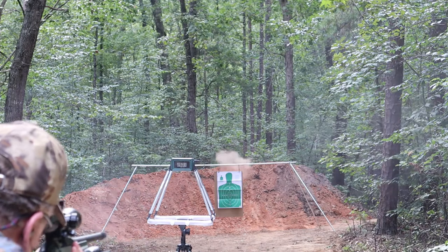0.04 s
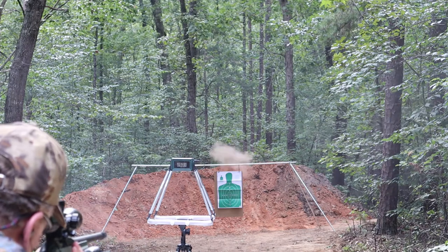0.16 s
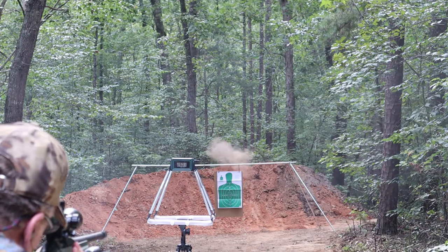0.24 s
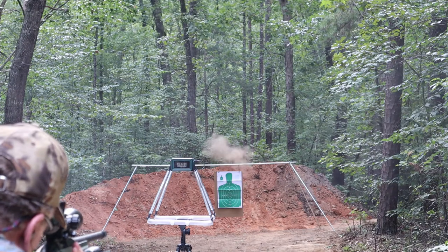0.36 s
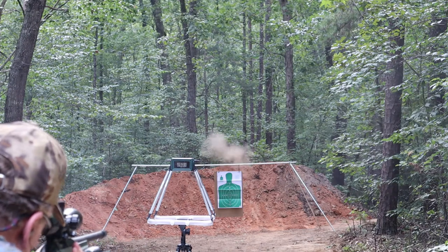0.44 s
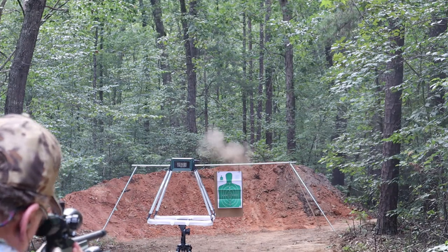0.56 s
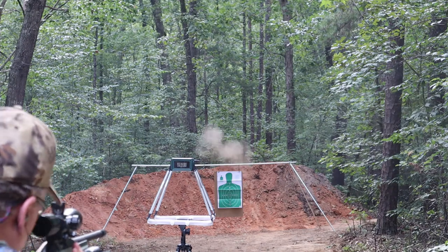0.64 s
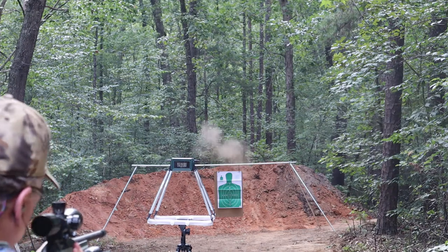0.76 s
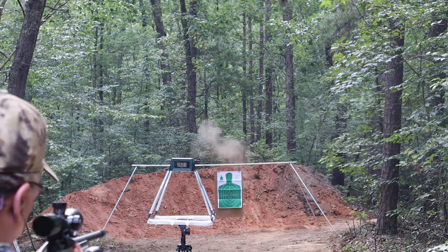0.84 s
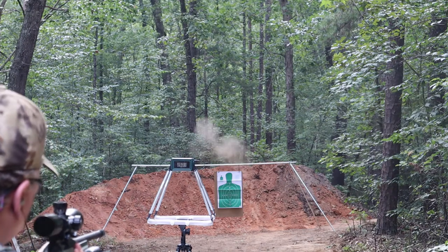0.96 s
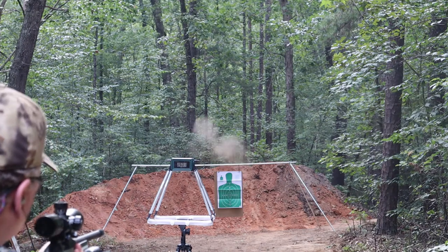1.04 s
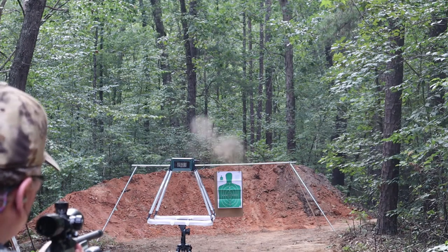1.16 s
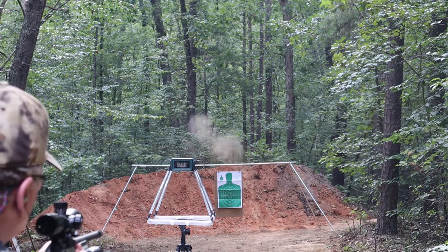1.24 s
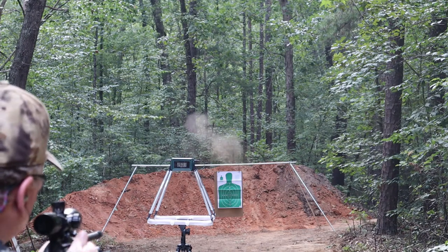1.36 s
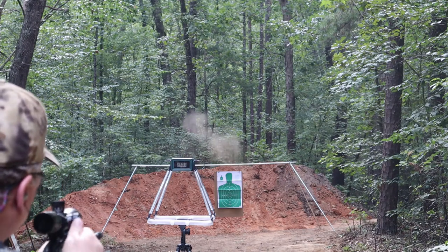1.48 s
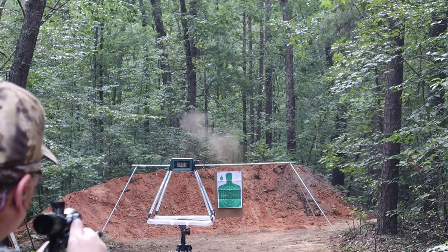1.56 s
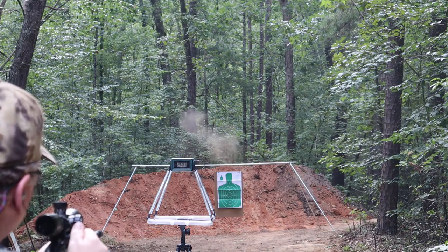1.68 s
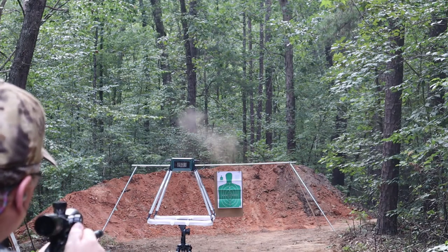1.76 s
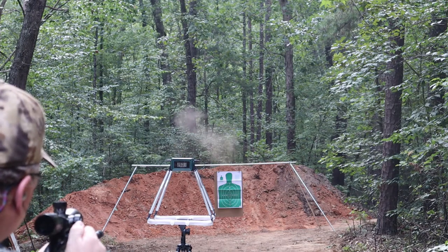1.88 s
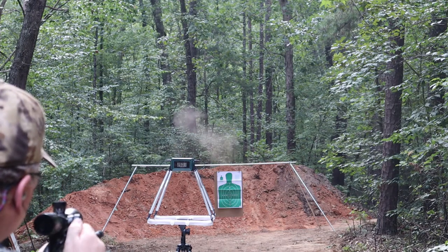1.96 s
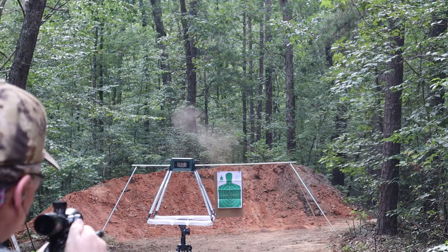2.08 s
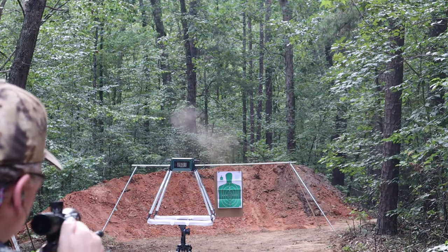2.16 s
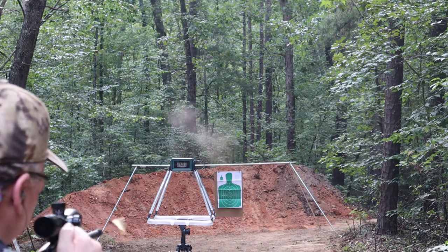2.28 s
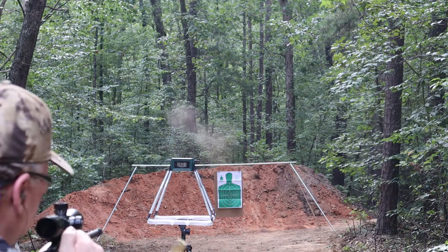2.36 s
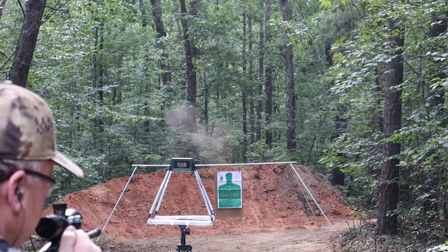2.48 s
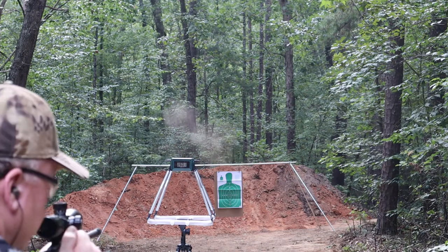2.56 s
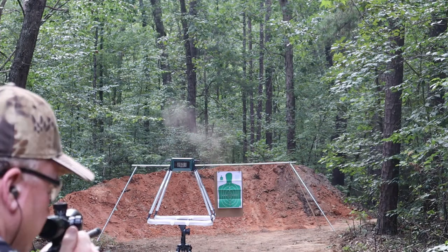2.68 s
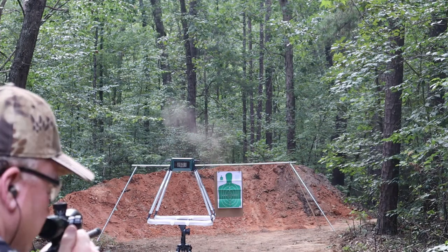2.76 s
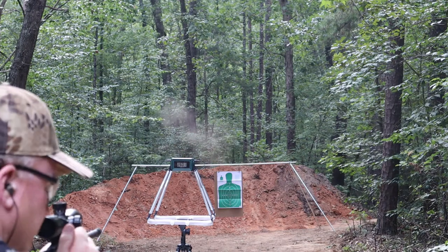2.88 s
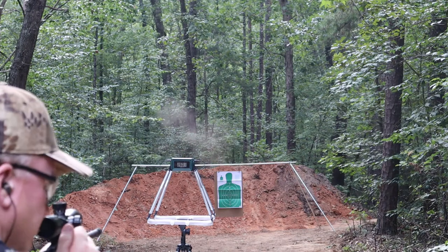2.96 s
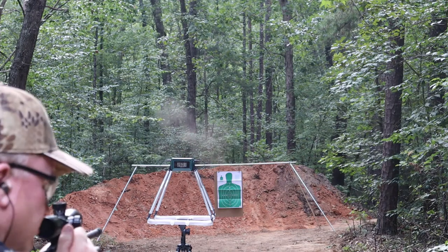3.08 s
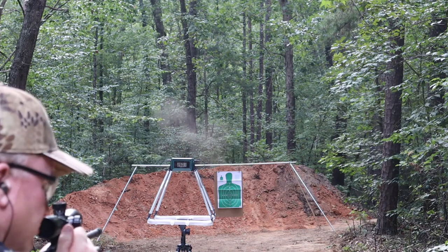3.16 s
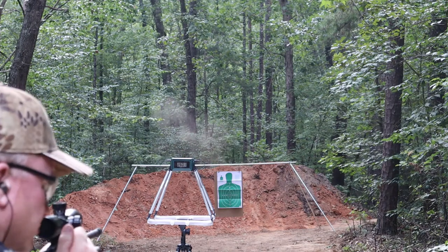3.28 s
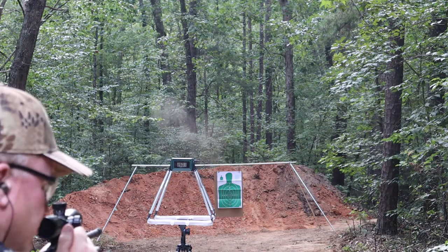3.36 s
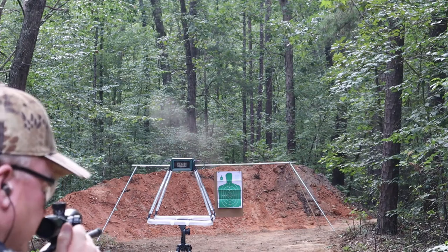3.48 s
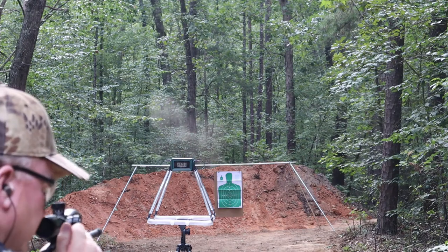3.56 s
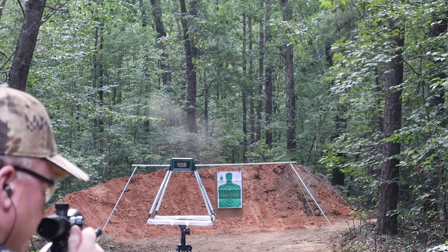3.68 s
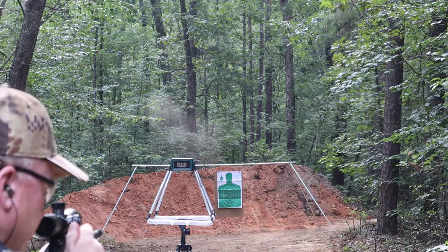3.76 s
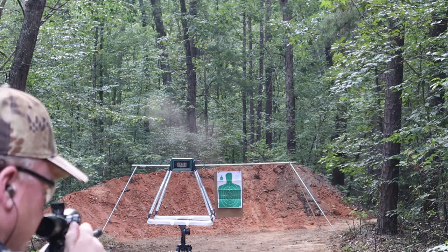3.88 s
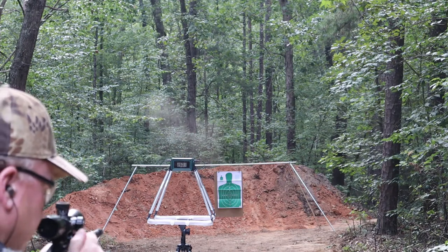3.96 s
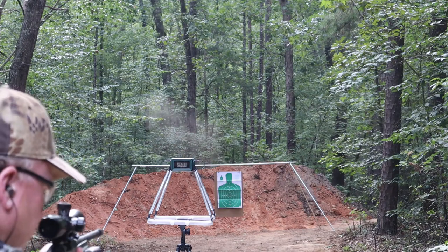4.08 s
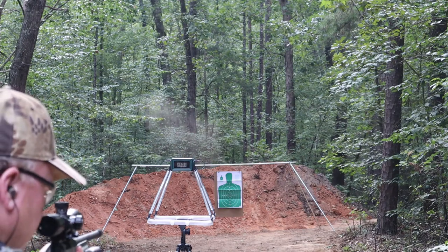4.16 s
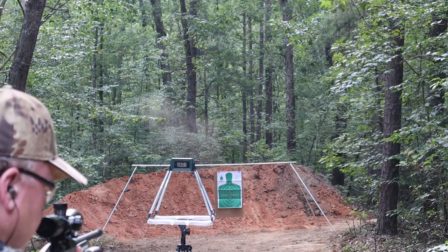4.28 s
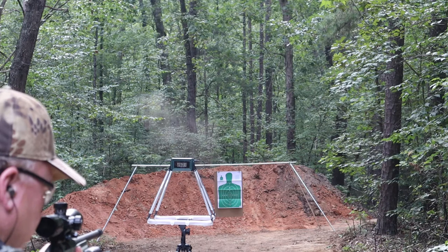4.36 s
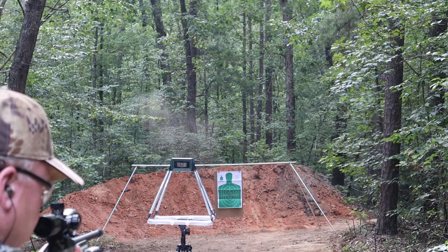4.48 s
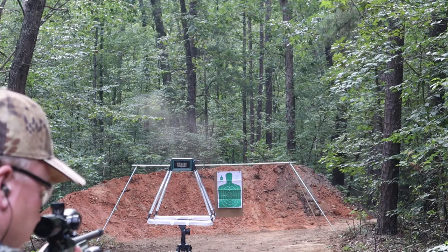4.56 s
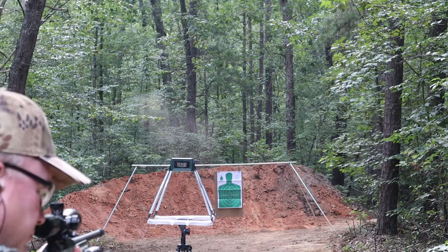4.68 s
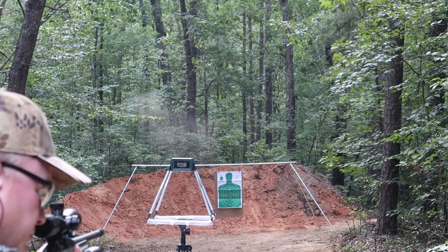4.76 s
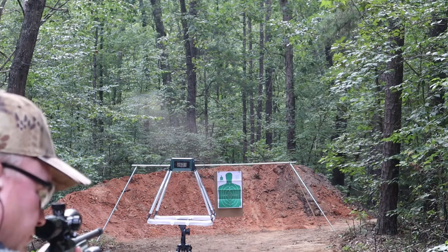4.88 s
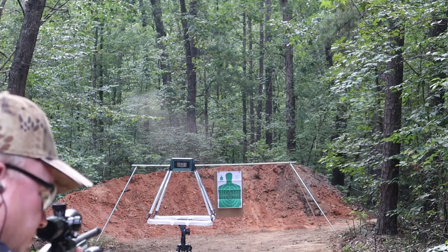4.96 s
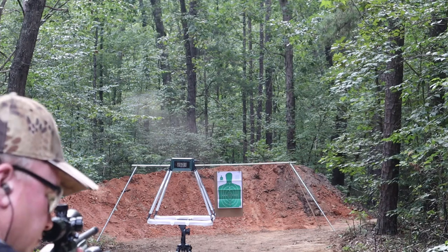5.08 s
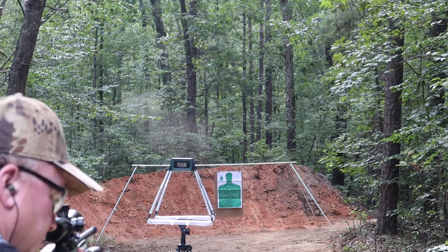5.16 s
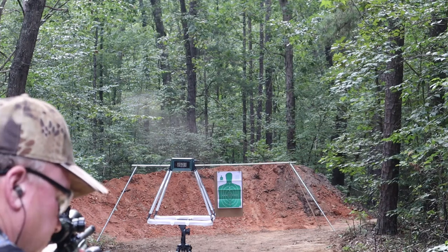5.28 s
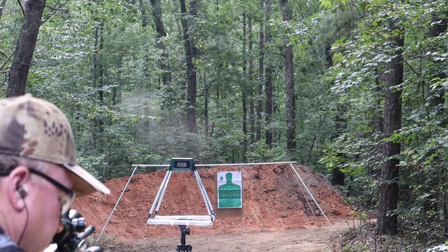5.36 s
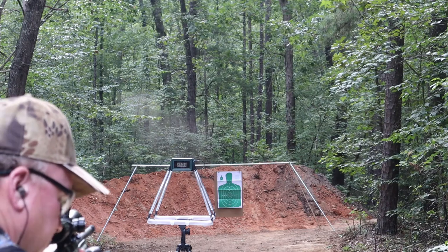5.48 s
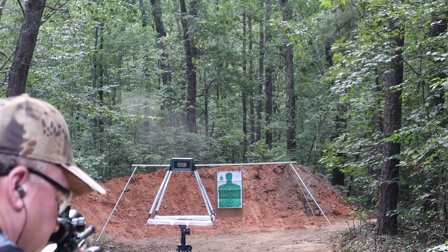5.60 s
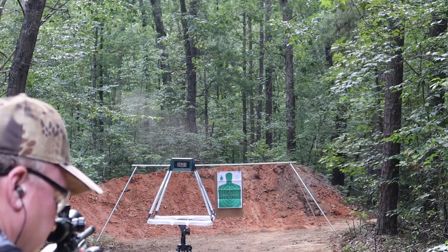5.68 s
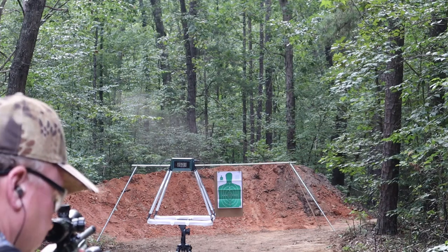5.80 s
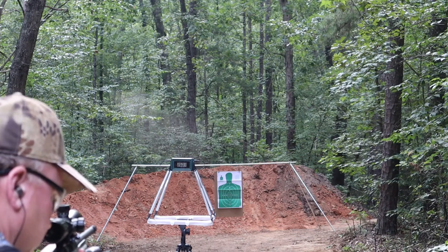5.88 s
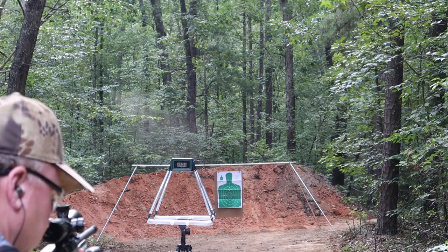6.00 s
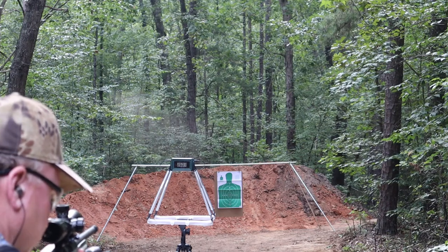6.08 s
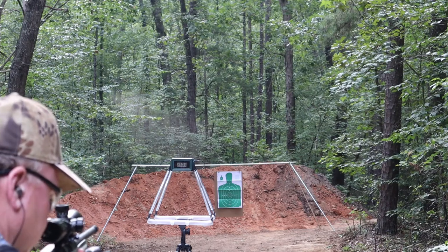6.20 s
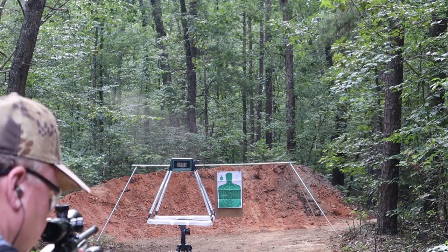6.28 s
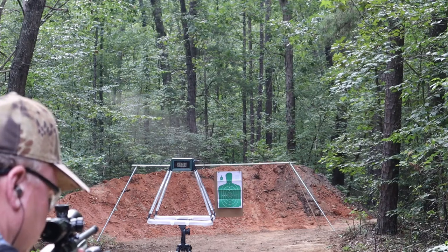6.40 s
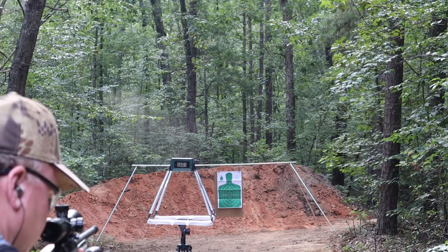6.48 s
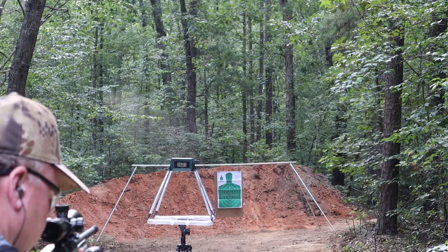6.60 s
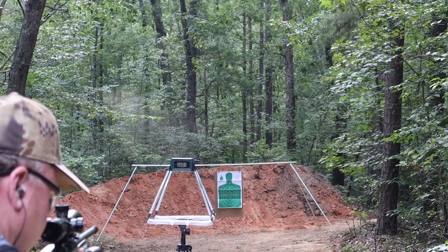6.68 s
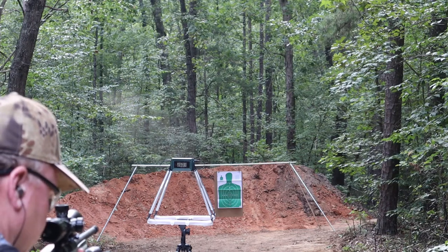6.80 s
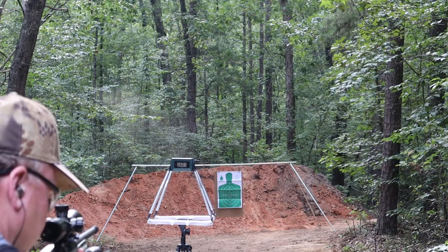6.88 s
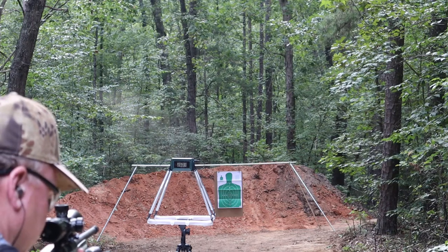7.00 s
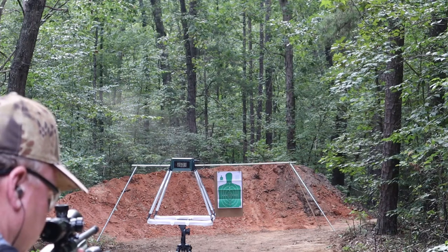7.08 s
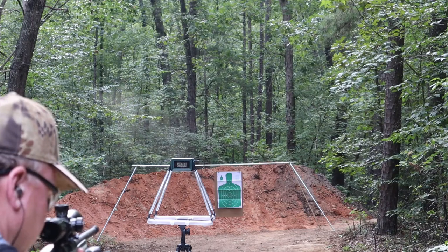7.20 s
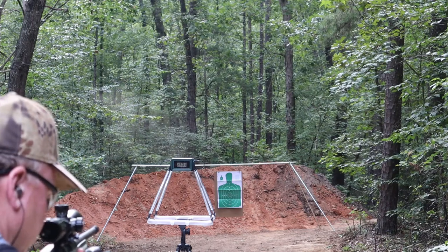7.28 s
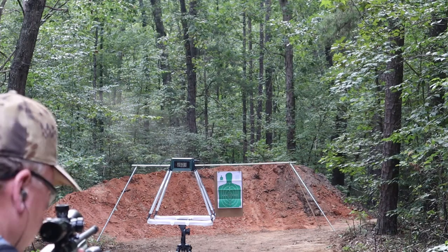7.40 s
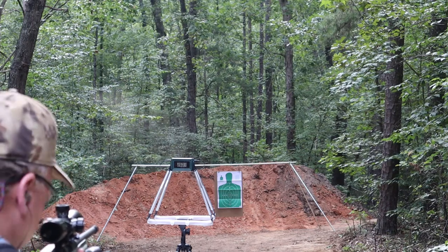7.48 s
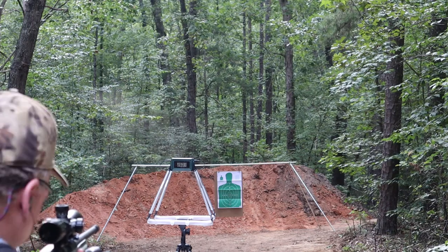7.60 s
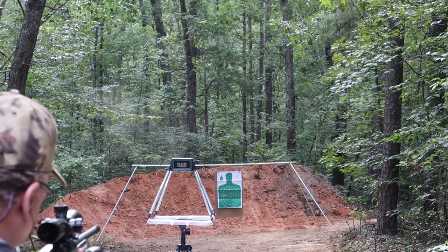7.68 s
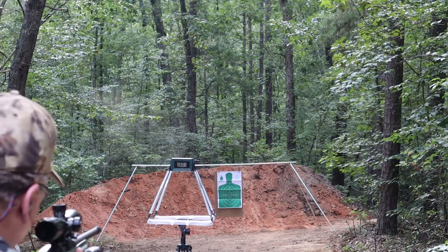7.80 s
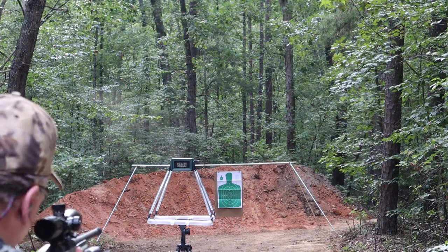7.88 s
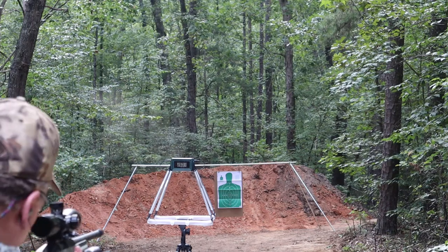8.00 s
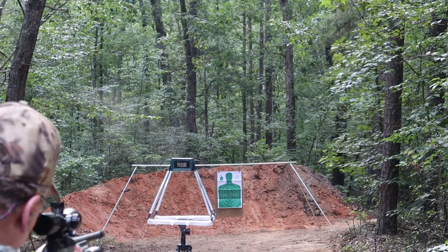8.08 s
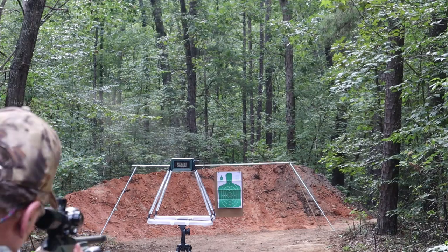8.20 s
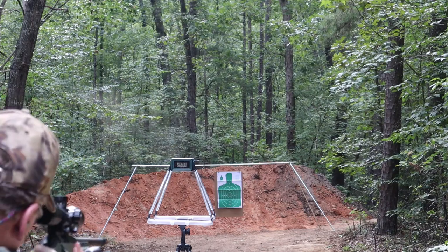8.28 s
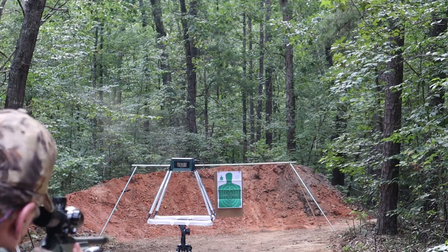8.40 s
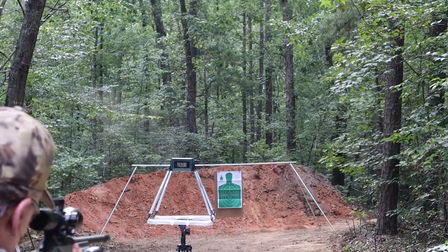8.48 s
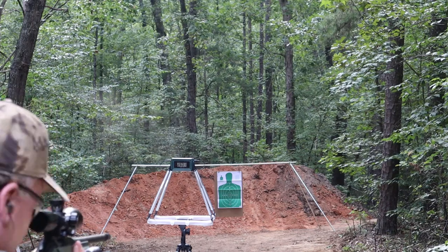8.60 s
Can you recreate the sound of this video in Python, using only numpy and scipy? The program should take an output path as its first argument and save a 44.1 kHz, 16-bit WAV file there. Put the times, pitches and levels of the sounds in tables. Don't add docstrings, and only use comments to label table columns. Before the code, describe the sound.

Gunshot echo fades among trees, followed by crisp metallic bolt working, a ringing case on a bench, a hard lock-up and faint insects.

```python
import sys
import numpy as np
from scipy import signal
from scipy.fft import rfft, irfft
from scipy.io import wavfile
from scipy.ndimage import uniform_filter1d

SR = 44100
rng = np.random.default_rng(int(sys.argv[2]) if len(sys.argv) > 2 else 0)


def unload_wav(signal):
    wavfile.write(
        sys.argv[1],
        SR,
        np.round(np.clip(np.atleast_2d(signal).T, -1, 1) * 32767).astype(np.int16),
    )


def natural_amplitude(level_db):
    exponent = np.asarray(level_db, float) / 20
    return 10 ** exponent


N = 381134
HZ = np.fft.rfftfreq(512, 1 / SR)
FRAME_S = np.arange(N // 128 + 5) * 128 / SR


def evened(x):
    return x / np.sqrt(np.mean(x ** 2) + 1e-20)


def read(points, hz):
    f, value = np.transpose(points)
    return np.interp(np.log(hz + 1), np.log(f + 1), value)


def band_db(points, lo, hi):
    db = read(points, HZ)
    inside = (HZ >= lo) & (HZ < hi)
    return db - 10 * np.log10(np.sum(natural_amplitude(db[inside]) ** 2) / len(HZ))


def spectrogram(x):
    return signal.stft(x, nperseg=512, noverlap=384)[2]


def resynth(z):
    return signal.istft(z, nperseg=512, noverlap=384)[1][..., :N]


def shaped(x, db):
    z = spectrogram(x)
    return resynth(z * natural_amplitude(db)[..., :z.shape[-1]])


def patches(tall, long):
    field = rng.standard_normal((len(FRAME_S), len(HZ))).T
    field = uniform_filter1d(field, int(tall), 0)
    return evened(uniform_filter1d(field, int(long), 1))


def rough(depth_db, samples):
    wobble = evened(uniform_filter1d(rng.standard_normal(N), samples))
    return evened(natural_amplitude(depth_db * wobble))


def mid_side(db, side, grain=1, lean=0):
    noise = rng.standard_normal((N, 2)).T * grain
    mid, side = shaped(noise, np.array([db, db + read(side, HZ)[:, None]]))
    return np.array([mid, side + lean * mid])


def add(mix, s, sound):
    part = mix[:, round(s * SR):][:, :sound.shape[1]]
    part += sound[:, :part.shape[1]]


def recorder_gain_db():
    duck_db, climb_db_per_s = -17.5, 4.5
    clamp_db, clamp_s = -5.5, 0.87
    climb = np.minimum(duck_db + climb_db_per_s * FRAME_S, 0)
    return climb + clamp_db * np.exp(-(FRAME_S / clamp_s) ** 4)


# t/s, level/dB
GUSTS = [(0, -46), (1.5, -75.5), (2.2, -64.5), (3.9, -63), (4.6, -58), (5.2, -59.5), (6.1, -60.5),
         (7.6, -53.5), (8.64, -58.5)]
# f/Hz, level/dB per Hz
WIND = [(20, -3), (45, -2), (80, 9.5), (140, -27), (250, -18), (500, -73)]


def wind():
    side_db = -12
    level_db = np.interp(FRAME_S, *np.transpose(GUSTS)) + recorder_gain_db()
    db = band_db(WIND, 25, 120)[:, None] + level_db + 1.5 * patches(3, 30)
    return mid_side(db, [(20, side_db), (500, side_db)])


HISS_DB = -82.5
# f/Hz, level/dB per Hz
LEAVES = [(59, -17.5), (100, 1.5), (157, -5), (555, -10), (668, -13), (2080, -23), (2720, -24), (6750, -33),
          (8470, -33), (9390, -38.5), (10800, -38), (12300, -42.5), (14200, -57)]
# f/Hz, side minus mid level/dB
LEAVES_SIDE = [(60, -35.5), (150, -5.5), (360, -2.5), (900, 3), (2210, 4), (5460, 4.5), (13400, 8)]


def leaves():
    level_db = HISS_DB + recorder_gain_db()
    db = band_db(LEAVES, 9140, 14200)[:, None] + level_db + 0.58 * patches(7.1, 22)
    return mid_side(db, LEAVES_SIDE)


# f/Hz, width/Hz, level/dB over the hiss
INSECTS = [(8355, 810, 8.5)]


def insects():
    chorus_db, bolder_db_per_s = -6.5, 0.95
    level_db = HISS_DB + recorder_gain_db() + chorus_db + bolder_db_per_s * FRAME_S
    throb_db = 1.5 * patches(20, 6)
    out = np.zeros((2, N))
    for hz, width, db in INSECTS:
        hump = [(hz - width, -30), (hz - width / 2, -8), (hz, 0), (hz + width / 2, -6), (hz + width, -30)]
        out += mid_side(band_db(hump, 0, SR)[:, None] + level_db + db + throb_db, LEAVES_SIDE)
    return out


# f/Hz, level/dB per Hz
ECHO_FRESH = [(18, -51.5), (30, -14), (144, -20), (344, -9), (434, -5), (493, -7), (654, -3), (1040, -9),
              (3050, -12.5), (12000, -22.5), (14800, -32)]
ECHO_MIDDLE = [(18, -63), (30, -32), (60, -23.5), (181, -21), (381, -1.5), (546, 3.5), (890, -7),
               (2200, -18), (4160, -29), (10500, -53.5), (13900, -74.5)]
ECHO_OLD = [(20, -62), (60, -32), (140, -26), (220, -12.5), (350, -3.5), (520, -3), (800, -10.5),
            (1200, -24), (2000, -36), (3500, -59), (8000, -104)]
# f/Hz, side minus mid level/dB
ECHO_SIDE = [(60, -5.5), (150, -34.5), (360, -13), (900, -2.5), (2210, 3), (5460, 6), (13400, 5.5)]
# t/s, peak level/dB, left minus right level/dB
TRUNKS = [(0.015, -17.5, 29), (0.055, -23, 13.5), (0.097, -13.5, 14), (0.162, -11.5, 5), (0.567, -42, 9),
          (0.738, -24, 4.5)]


def echo():
    swell_s, swell_db = 0.18, -6
    near_db, near_db_per_s, far_db, far_db_per_s = -6.5, 34.5, -19, 15
    late = np.maximum(FRAME_S - swell_s, 0)
    power = natural_amplitude(near_db - near_db_per_s * late) ** 2 + natural_amplitude(far_db - far_db_per_s * late) ** 2
    swell = swell_db * np.maximum(1 - FRAME_S / swell_s, 0) ** 2
    level_db = 10 * np.log10(power) + swell + recorder_gain_db()

    dull = np.clip(2.557 * (1 - np.exp(-FRAME_S / 1.398)), 0, 3)
    fresh, middle, old = (band_db(c, 300, 800)[:, None] for c in (ECHO_FRESH, ECHO_MIDDLE, ECHO_OLD))
    colour = fresh + np.minimum(dull, 1) * (middle - fresh) + np.maximum(dull - 1, 0) * (old - middle)
    db = colour + level_db + 0.8545 * patches(8.2, 12)
    lean = 0.122 * (1 - np.exp(-np.arange(N) / SR / 0.28))
    out = mid_side(db, ECHO_SIDE, rough(0.79, 60), lean)

    trunk_hz, trunk_db = 650, -3
    t = np.arange(-132, 132) / SR
    bump = np.cos(2 * np.pi * trunk_hz * t) * np.exp(-(t * trunk_hz * 1.67) ** 2)
    for s, peak_db, pan_db in TRUNKS:
        add(out, s, natural_amplitude(peak_db + trunk_db) * bump * [[1], [np.tanh(pan_db / 17)]])
    return out


# f/Hz, t60/s
WOODS = [(150, 0.43), (500, 0.57), (1500, 0.66), (4000, 0.816), (10000, 0.685)]
# f/Hz, level/dB
SCATTER = [(150, 2), (900, -2), (2800, -1.5), (4500, 1), (8000, 1), (13000, -2)]


def surroundings(x):
    wet_db, gap_frames, blur_bins = -12, 4, 9
    bank_db, bank_s = 5, 0.0558
    power = uniform_filter1d(abs(spectrogram(x)) ** 2, blur_bins, 1)
    t = FRAME_S[:200]
    fading = natural_amplitude(-120 * t / read(WOODS, HZ)[:, None] + 2 * bank_db * (t < bank_s))
    fading = fading * (np.arange(200) >= gap_frames)
    fading = fading / fading.sum(1, keepdims=True)
    power = signal.fftconvolve(power, fading[None], axes=2)
    noise = spectrogram(rng.standard_normal((N, 2)).T)
    tail = evened(abs(noise)) * np.exp(1j * np.angle(noise))
    tail = tail * np.sqrt(abs(power[..., :noise.shape[2]]))
    return natural_amplitude(wet_db) * resynth(tail * natural_amplitude(read(SCATTER, HZ))[:, None])


# t/s, peak level/dB, f/Hz, t60/s
THUMPS = [
    (2.244, -46, 128, 0.1),
    (2.332, -42, 163.4, 0.1),
    (2.616, -34, 193, 0.13),
    (2.821, -48, 195, 0.278),
    (3.795, -38.5, 178, 0.21),
    (4.121, -40, 176.7, 0.42),
    (6.741, -46, 198, 0.11),
    (7.527, -34, 176, 0.1),
]


def thumps():
    rise_s, side = .006, .25
    out, t = np.zeros((2, N)), np.arange(SR // 3) / SR
    for s, peak_db, hz, t60 in THUMPS:
        note = np.sin(2 * np.pi * hz * t)
        note = note + 0.55 * np.sin(2 * np.pi * (0.814 * hz * t + rng.random()))
        add(out, s, natural_amplitude(peak_db - 60 * t / t60) * (1 - np.exp(-t / rise_s)) * note * [[1], [side]])
    return out


# f/Hz, level/dB, share of the ring time
BRASS = [(10207, 7.5, 1.16), (10232, 3, 0.84), (10214, -15, 4.6)]
# t/s, peak level/dB, t60/s
BRASS_BLOWS = [(2.268, -57.5, .12), (2.298, -52, .15), (2.311, -46, .15), (2.333, -50, 0.273),
               (2.821, -53.5, .13), (2.8943, -58, 0.22), (3.012, -45.5, 0.26), (3.1224, -49.5, 0.21),
               (3.2273, -69, .2)]


def brass():
    beat_side = 0.35
    out, t = np.zeros((2, N)), np.arange(SR // 2) / SR
    for s, peak_db, t60 in BRASS_BLOWS:
        ring = np.zeros(len(t))
        for hz, db, share in BRASS:
            turn = rng.random() / 4
            ring += natural_amplitude(db - 60 * t / (share * t60)) * np.sin(2 * np.pi * (hz * t + turn))
        add(out, s, natural_amplitude(peak_db - 7.5) * ring * np.minimum(t / 0.00046, 1) * [[1], [beat_side]])
    return out


# f/Hz, side minus mid level/dB
HIT_SIDE = [(60, -13), (150, -17), (360, -22), (900, -11), (2210, -2), (5460, 4.5), (13400, 7.5)]


def blows(rows, modes, low_hz, high_hz, crack_db, tick_db, chatter, damping, uneven, ring, pan_db):
    spread = 0.048
    out, t = np.zeros((2, N)), np.arange(4096) / SR
    hz, db, t60 = (c[:, None] for c in np.transpose(modes))
    mode_s = np.clip(np.minimum(t60, ring * (1000 / hz) ** damping), .004, 1)
    bins = np.fft.rfftfreq(len(t), 1 / SR)
    octaves = 400 * 2. ** np.arange(6)[:, None]
    split = np.clip(1 - abs(np.log2(bins + 1) - np.log2(octaves)), 0, 1)
    crack_fade = natural_amplitude(-60 * t / (ring * (1000 / octaves) ** damping))
    for s, peak_db, bass_db, treble_db in rows:
        weaker, detune, flip, delay = rng.random((4, 2, len(hz), 1))
        late = np.maximum(t - chatter * delay ** 2, 0)
        tone = np.sin(2 * np.pi * hz * (1 + spread * (detune[0] - .5)) * late) * np.sign(flip - .5)
        sound = np.sum(natural_amplitude(uneven * db - 5 * weaker - 60 * late / mode_s) * tone, 1)
        sound = sound / abs(sound[0]).max()

        noise = irfft(rfft(rng.standard_normal((len(t), 2)).T)[:, None] * split)
        noise = noise / noise.std(axis=2, keepdims=True) * crack_fade
        sound = sound + natural_amplitude(crack_db - 16.5) * noise.sum(1) * np.minimum(t / 0.000091, 1)
        sound[:, 8:10] += natural_amplitude(tick_db) * np.array([1, -1])

        colour = read([(low_hz / 5, bass_db - 11.5), (low_hz / 2, bass_db), (low_hz * 3.24, 0),
                       (high_hz / 1.24, 0), (high_hz * 1.21, treble_db), (high_hz * 4, treble_db - 17.5)], bins)
        sound = irfft(rfft(np.roll(sound, 64, 1)) * natural_amplitude([colour, colour + read(HIT_SIDE, bins)]))
        sound = sound + np.array([[0], [np.tanh(pan_db / 17)]]) * sound[0]
        add(out, s - 64 / SR, natural_amplitude(peak_db) * sound / abs(sound[0]).max())
    return out


# t/s, peak level/dB, bass and treble level/dB over the middle
BENCH = [(5.407, -48.5, -24, -13), (5.424, -49, -27.5, -11.5), (5.528, -54, -18.5, -22),
         (6.738, -24.5, -7.5, -17), (6.7404, -35.5, 10, -25),
         (3.0, -44, -17, -25), (7.527, -49, 18, -28), (7.547, -45.5, 29, -25)]
# f/Hz, level/dB, t60/s
LEG = [(353, -2.5, 0.12), (462, -3, 0.19), (712, -8, 0.15), (767, 0.5, 0.09), (1200, 0, 0.021),
       (1412, -11, 0.053), (2170, -26.5, 0.04), (2700, -30, 0.027), (3300, -20, 0.023), (4120, -8, 0.028)]


def bench_touches():
    return blows(BENCH, LEG, low_hz=500, high_hz=2390, crack_db=-5.0, tick_db=-15, chatter=0.00071,
                 damping=0.33, uneven=0.45, ring=0.1047, pan_db=0.5)


# t/s, peak level/dB, bass and treble level/dB over the middle
DROP = [
    (2.6164, -22.5, 0.0069, -14.5),
    (2.6188, -25, 0.0072, -10),
]
# f/Hz, level/dB, t60/s
BEAM = [(364, -20.5, 0.17), (489, -6, 0.093), (703, 2.5, .095), (754, 2, .098), (940, -12.5, .1),
        (1287, -6, .068), (1450, -3, .06), (1950, -20, .05), (2120, -14, 0.048), (3630, 12, .04),
        (4300, -13.5, .035)]


def heavy_drop():
    return blows(DROP, BEAM, low_hz=500, high_hz=2180, crack_db=2.0, tick_db=12, chatter=0.001,
                 damping=0.937, uneven=0.36, ring=0.058, pan_db=0.94)


# t/s, peak level/dB, bass and treble level/dB over the middle
CASE = [
    (2.8209, -24.5, -6.5, -10),
    (2.8948, -36, 1, -23),
    (3.0109, -24, -10.5, -6),
    (3.121, -30.5, -8, -3.5),
    (3.182, -47, -2, -15),
    (3.2289, -36.5, -1.5, -8.5),
]
# f/Hz, level/dB, t60/s
PLANK = [(529, -17, 0.23), (676, -14, 0.29), (936, -57, 5.0), (1290, -18, 0.098), (1440, -44, 5.0),
         (1938, 0.5, 0.082), (2480, 18.5, 0.011), (3424, 1, 0.076), (3650, -33, 0.23), (4200, 9, 0.076),
         (5046, -21, 0.054), (4970, 22, 0.012), (5360, -11, 0.092), (5580, -37.5, 0.06)]


def case_bounces():
    return blows(CASE, PLANK, low_hz=887, high_hz=3720, crack_db=2.0, tick_db=-17, chatter=0.00151,
                 damping=1.05, uneven=0.21, ring=0.11, pan_db=0.0)


# f/Hz, level/dB per Hz
LIFT = [(250, -52), (470, -26), (800, -9.5), (2010, -13), (2490, -15), (12300, -34), (13900, -43)]
DRAW = [(300, -43), (600, -14), (989, -3), (1250, -26), (2290, -10), (6150, -28), (10500, -16.5),
        (13900, -36.5)]
ROLL = [(240, -35), (400, -2), (674, -5.5), (1600, -8), (3170, -28), (9000, -50.5), (11700, -74)]
PUSH = [(300, -27), (900, 1), (2270, -4), (3700, -13.5), (4600, 1), (5600, -14), (9610, -22.5),
        (13900, -31)]
SEAT = [(300, -14), (900, -1), (2000, -1), (3600, -8), (4500, -9), (5600, -6), (8000, -27), (13900, -30.5)]
SLEEVE = [(1200, -6), (3400, -5), (4500, -2), (5700, -9), (8000, -27)]
# start t/s, length/s, mid-stroke level/dB, level gained/dB from start to end, fade/s
STROKES = [
    (1.483, 0.026, -55.5, 9, .009),
    (2.2, 0.15, -63.5, 14, .004),
    (2.893, 0.044, -54.5, -3, .004),
    (3.184, 0.036, -59.5, -6.5, 0.0019),
    (3.691, 0.032, -46, 8, .002),
    (3.72, 0.0281, -43.5, -9, 0.003),
    (3.741, 0.059, -45, 5, .003),
    (4.419, 0.23, -67, -4.5, 0.06),
]


def slides():
    shiver_db, shiver_s = -21, 0.00339
    db, t = np.zeros((len(HZ), len(FRAME_S))), np.arange(N) / SR
    shiver = np.zeros((1, N))
    for s, peak_db, *_ in BOLT:
        u = t[:4096] / shiver_s
        add(shiver, s, natural_amplitude(peak_db + shiver_db) * (u * np.exp(1 - u))[None])
    moving = np.zeros((2, N))
    for (s, length, mid_db, gain_db, fade), colour in zip(
            STROKES, (LIFT, DRAW, ROLL, ROLL, PUSH, PUSH, SEAT, SLEEVE)):
        db[:, FRAME_S > s - .015] = band_db(colour, 1500, 9000)[:, None]
        u = t[:round(length * SR)]
        edge = np.minimum(np.minimum(u, length - u) / fade, 1)
        add(moving, s, edge * np.array([natural_amplitude(mid_db + gain_db * (u / length - .5)), u ** 0]))
    grit = rough(4.5, 40)
    level = moving[0] + moving[1] * shiver[0]
    return mid_side(db + 2.5 * patches(7.7, 4.9), HIT_SIDE, grit * level)


# t/s, peak level/dB, f/Hz, t60/s
OPENING = [(1.4712, -51, 6600, .02), (1.4725, -63, 2500, .025), (1.4965, -55, 1950, .03),
           (1.5025, -43, 3200, .03), (2.2103, -39, 3600, 0.024), (2.2135, -54, 6800, .02),
           (2.2467, -42, 2615, .04), (2.2475, -39, 5350, .02), (2.2645, -39, 2365, .04),
           (2.2687, -38, 3240, 0.036), (2.279, -45.5, 2400, 0.076), (2.285, -45, 4500, .06),
           (2.312, -42.5, 1300, .05), (2.3338, -36, 867, 0.071), (2.3342, -31, 2060, 0.021),
           (2.3338, -30.5, 4880, 0.016)]
CLOSING = [(3.666, -48, 1880, .03), (3.677, -44.5, 940, 0.045), (3.677, -50, 2700, 0.032),
           (3.6935, -34, 940, 0.033), (3.698, -52, 5300, .08), (3.7285, -42, 9800, .06),
           (3.754, -43, 12500, .06), (3.75, -32.5, 1188, 0.036), (3.7278, -30.5, 4390, 0.058),
           (3.743, -31, 2200, .03), (3.7506, -30, 1590, 0.045), (3.7514, -35, 4520, .04),
           (3.774, -36, 1900, .04), (3.7948, -17, 1940, 0.0242), (3.7956, -29, 840, 0.052),
           (3.827, -36.5, 830, 0.04), (4.0838, -28, 3490, 0.0213), (4.0844, -25.5, 1350, 0.02),
           (4.087, -30, 1900, 0.0213), (4.1243, -27.5, 740, 0.03), (4.1262, -12, 2170, 0.014),
           (4.124, -22.5, 4500, 0.0188), (4.1235, -22.5, 3300, 0.017), (4.1238, -27.5, 457, 0.03),
           (4.128, -38, 340, 0.118), (4.088, -43, 192, 0.23), (4.146, -37.5, 420, .12),
           (4.15, -37, 2150, .06), (3.822, -39, 442, 0.066), (3.824, -38, 700, 0.055),
           (3.82, -40, 1600, .08), (3.7945, -26, 1350, .03)]
FINGERS = [(4.414, -54, 2900, .03), (4.657, -54, 1120, .05), (5.409, -51, 910, 0.101),
           (5.423, -50, 1540, .04), (5.527, -53, 1630, .05), (7.53, -47, 440, .12), (7.55, -51, 510, .1),
           (6.739, -43, 1400, .06), (5.41, -56.5, 1400, 0.044)]
BOUNCES = [(2.835, -69, 15470, .5), (2.895, -67, 15470, .3), (2.821, -31, 3390, 0.021),
           (2.822, -35, 1600, 0.0294), (2.8955, -45, 1166, .05), (2.8955, -44, 1850, .04),
           (3.0115, -46, 2100, 0.069), (3.0133, -40, 4690, 0.023), (3.122, -40, 3580, 0.0195),
           (3.2295, -42, 1390, 0.058)]


def pings():
    rise_s, twin, twin_db, side_db = 0.001, 1.045, -7, -3
    out, t = np.zeros((2, N)), np.arange(4096) / SR
    for k, (s, peak_db, hz, t60) in enumerate(OPENING + CLOSING + FINGERS + BOUNCES):
        turn = 2 * np.pi * hz * t + np.array([[0], [(-1) ** k]])
        ring = (np.sin(turn) + natural_amplitude(twin_db) * np.sin(twin * turn)) * (1 - np.exp(-t / rise_s))
        width = natural_amplitude([[0], [read(HIT_SIDE, hz) + side_db]])
        add(out, s, natural_amplitude(peak_db - 60 * t / t60) * ring * width)
    return out


# t/s, peak level/dB, lowest f/Hz, highest f/Hz
TICKS = [(1.4713, -40, 5000, 15000), (1.4965, -46, 1500, 10000), (1.503, -43, 2000, 12000),
         (2.2101, -40, 3000, 15000), (2.2118, -32.5, 6000, 13000), (2.2475, -39, 4000, 15000),
         (2.2685, -36, 1800, 12000), (2.3077, -42, 1500, 7000), (2.3338, -24, 1000, 10000),
         (2.821, -35, 1200, 9000), (2.8275, -46, 1000, 5000), (2.8945, -41, 2000, 11000),
         (3.0117, -38, 1200, 12100), (3.121, -50, 1520, 8000), (3.2287, -48.5, 1500, 7000),
         (3.7281, -24, 4000, 14000), (3.7345, -23.5, 3000, 12000), (3.7515, -29, 1200, 8000),
         (3.795, -20, 800, 8000), (3.7968, -15, 1000, 8000), (4.1233, -14, 1000, 14000),
         (8.3275, -46.5, 3000, 13000)]


def ticks():
    echo_s, echo_db, side_db = .0009, -5, -12
    out, one = np.zeros((2, N)), np.eye(1, 512)[0]
    for k, (s, peak_db, low_hz, high_hz) in enumerate(TICKS):
        band = signal.butter(3, [low_hz, high_hz], "band", fs=SR, output="sos")
        click = signal.sosfilt(band, one)
        bounce = natural_amplitude(echo_db) * np.roll(click, round(echo_s * SR))
        side = (-1) ** k * natural_amplitude(side_db) * (np.roll(click, 3) - click + bounce)
        add(out, s, natural_amplitude(peak_db) * np.array([click - bounce, side]) / abs(click).max())
    return out


# t/s, peak level/dB, bass and treble level/dB over the middle
BOLT = [(1.4717, -42, -6, 2), (1.5024, -32.5, -19, 0), (2.211, -34, -14, 13), (2.2329, -37.5, -4.5, -6),
        (2.2472, -36.5, -3, 2), (2.2676, -33, -40.5, -3), (2.3076, -38, -17, 6), (2.328, -37, -15, -9),
        (2.3323, -24, -7.5, -0.5), (3.5149, -47.5, 13, -1.5), (3.5367, -42.5, -4.5, -4),
        (3.6666, -37, 5, -13), (3.693, -39, 16.5, -13), (3.7218, -26, -1.5, 2.5), (3.743, -34, -19.5, -10),
        (3.7519, -19.5, -8.5, -1), (3.7902, -19.5, -15, -4), (3.7949, -11.5, -2, 4), (4.0727, -42, -9, 1),
        (4.084, -19, -13.5, 5), (4.087, -32.5, 4, -8), (4.1232, -11, -3, -2), (4.1271, -32, -21, -12),
        (8.326, -43, -25.5, 2)]
# f/Hz, level/dB, t60/s
STEEL = [(778, -2.5, 0.077), (1454, 1, 0.041), (2238, 11, 0.0036), (2890, -14.5, 0.037),
         (3270, -1.5, 0.019), (4570, -9, 0.0038), (487, -7.5, 0.05), (1360, -15.5, 0.04), (7000, -5, 0.018),
         (8000, -10.5, 0.009), (1897, -1, 0.04), (8900, -9, 0.009), (12540, -32, 0.028),
         (11350, 4.5, 0.0084)]


def bolt_action():
    return blows(BOLT, STEEL, low_hz=1010, high_hz=4170, crack_db=-1.0, tick_db=12.0, chatter=0.0029,
                 damping=0.15, uneven=0.72, ring=0.0303, pan_db=-0.7)


def scene():
    near = bolt_action() + case_bounces() + heavy_drop() + bench_touches()
    near += slides() + pings() + ticks()
    answers = surroundings(near) + thumps() + brass()
    background = echo() + leaves() + insects() + wind()
    mid, side = near + answers + background
    return np.array([mid + side, mid - side])


def band_limit(x):
    return signal.sosfilt(signal.butter(12, 15600, fs=SR, output="sos"), x)


def record(dry):
    bass_cut = signal.butter(2, 35, "high", fs=SR, output="sos")
    treble_limit = signal.butter(8, 13900, fs=SR, output="sos")
    mix = signal.sosfilt(treble_limit, signal.sosfilt(bass_cut, dry))
    return band_limit(mix)


dry = scene()
out = record(dry)
unload_wav(out)
```